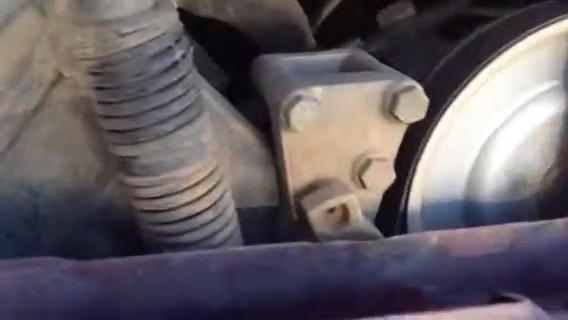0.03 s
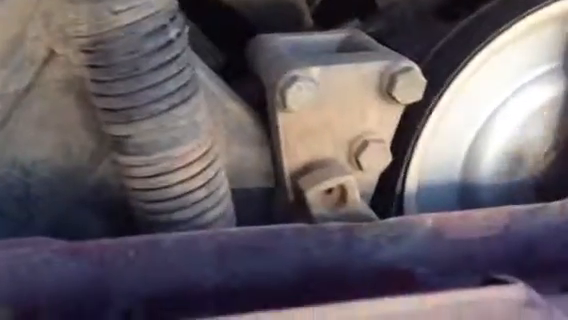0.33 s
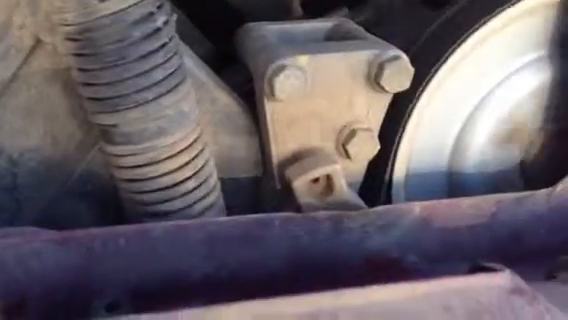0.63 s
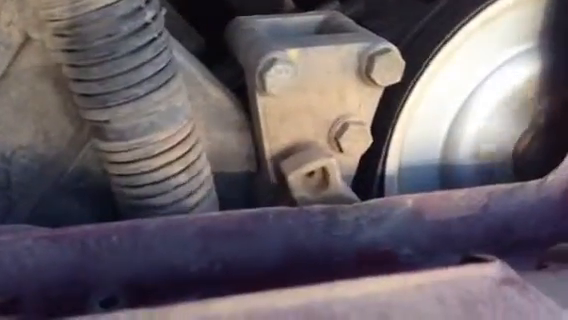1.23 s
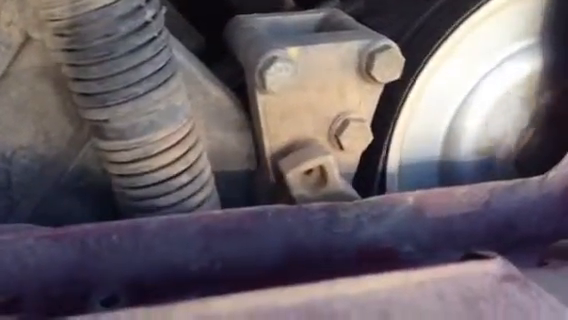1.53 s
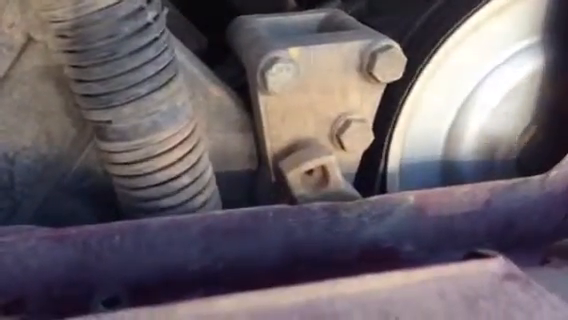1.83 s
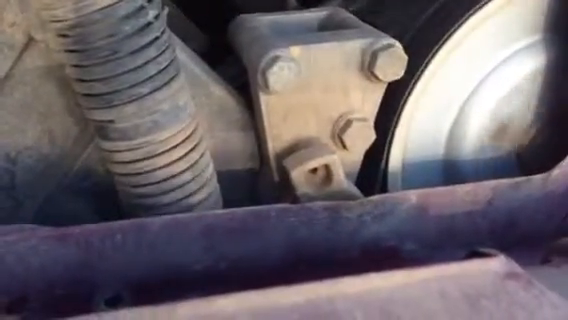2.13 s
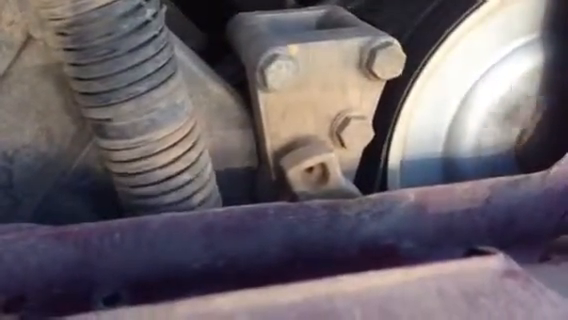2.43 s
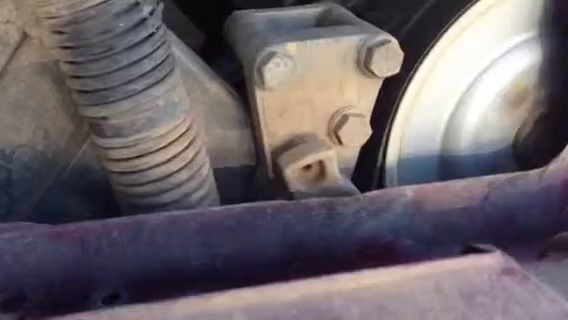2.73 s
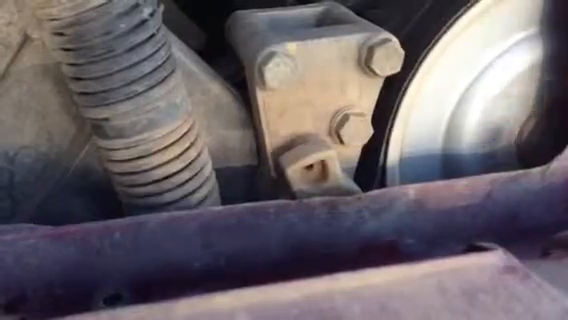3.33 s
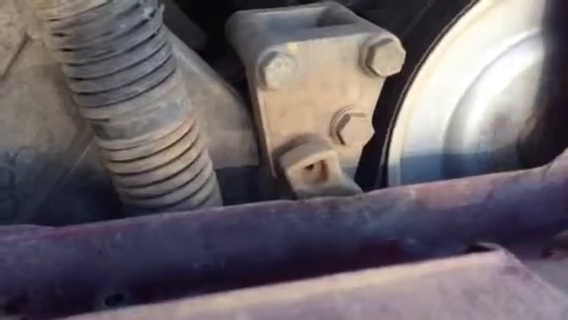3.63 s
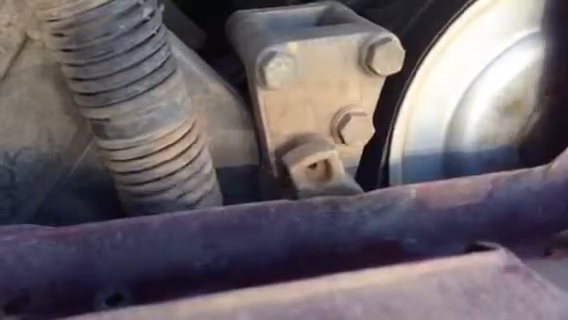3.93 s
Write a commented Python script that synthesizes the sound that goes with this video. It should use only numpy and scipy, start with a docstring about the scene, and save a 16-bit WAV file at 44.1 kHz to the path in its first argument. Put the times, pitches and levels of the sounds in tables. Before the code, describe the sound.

Constant shrill belt squeal close up, with an idling engine ticking and humming underneath.

```python
"""A drive belt squeals on its pulley, the microphone close by in the open bay of an idling engine.
The belt sticks and slips: each firing of the five cylinders jerks it, so the squeal warbles,
and worn patches come round with every lap. A near panel throws the squeal back.
Behind it the belt rubs and the valve gear ticks; underneath, the block knocks and hums
and the exhaust throbs with every cycle."""
import sys
import numpy as np
from scipy import signal
from scipy.fft import rfft, irfft
from scipy.io import wavfile
from scipy.ndimage import uniform_filter1d, minimum_filter1d

SR = 44100
rng = np.random.default_rng(int(sys.argv[2]) if len(sys.argv) > 2 else 0)


def inscribe(sig):
    """Save sig as 16-bit PCM at rate SR to the path in sys.argv[1].

    A 1-D sig is mono; a 2-D sig holds one channel per row.
    Samples are clipped to [-1, 1] before scaling.
    """
    pcm = np.round(np.clip(np.atleast_2d(sig).T, -1, 1) * 32767)
    wavfile.write(sys.argv[1], SR, pcm.astype(np.int16))


N = 176400
CYLINDERS = 5  # firings in one engine cycle


def undb(db):
    """Decibels to gain."""
    return 10 ** (np.asarray(db) / 20)


def level(x, db):
    """Scale to an rms level."""
    return x * undb(db) / np.sqrt(np.mean(x ** 2))


def colour(x, points):
    """Minimum-phase filter through the points (f/Hz, gain/dB)."""
    hz, db = np.array(points).T
    bins_hz = np.fft.rfftfreq(N, 1 / SR)
    log_gain = np.log(undb(np.interp(np.log(bins_hz + 1), np.log(hz), db)))
    cepstrum = irfft(log_gain, N)
    cepstrum[1:N // 2] *= 2
    cepstrum[N // 2 + 1:] = 0
    return irfft(rfft(x) * np.exp(rfft(cepstrum)), N)


def band_noise(low_hz, high_hz):
    """Noise in one band, rms 1."""
    band = signal.butter(2, [low_hz, high_hz], "band", fs=SR, output="sos")
    return level(signal.sosfilt(band, rng.standard_normal(N)), 0)


def wander(top_hz):
    """Random motion mostly slower than top_hz, rms 1."""
    ratio = np.fft.rfftfreq(N, 1 / SR) / top_hz
    return level(irfft(rfft(rng.standard_normal(N)) / (1 + ratio ** 2), N), 0)


def repeating(turns, count):
    """A random pattern of count equal partials that comes back with every turn, rms 1."""
    size = 32768
    partials = np.r_[0, np.exp(2j * np.pi * rng.random(count))]
    return level(np.interp(turns % 1 * size, np.arange(size), irfft(partials, size)), 0)


def clatter(firings, fresh):
    """Excitation that repeats each engine cycle, with a share of its power as fresh noise."""
    pattern = repeating(firings / CYLINDERS, count=1500)
    return np.sqrt(1 - fresh) * pattern + np.sqrt(fresh) * rng.standard_normal(N)


def swell(place, width_s, firings, rate):
    """Bell curve around a place in each engine cycle, and the seconds since its nearest peak."""
    age = ((firings - place + CYLINDERS / 2) % CYLINDERS - CYLINDERS / 2) / rate
    return np.exp(-(age / width_s) ** 2), age


def bay(x, t60_s=.04, tail_db=-17, panel_delay_s=.00492, panel_gain=.26):
    """The bay at the microphone: direct sound, one near panel and a short scattered tail."""
    t = np.arange(4096) / SR
    tail = rng.standard_normal(len(t)) * undb(-60 * t / t60_s)
    response = undb(tail_db) * tail / np.linalg.norm(tail)
    response[0] = 1
    response[round(panel_delay_s * SR)] += panel_gain
    return signal.fftconvolve(x, response)[:N]


# Response of the engine on its mounts (f/Hz, relative level/dB)
MOUNT_RESPONSE = [(20, -47), (55, -14), (85, -17), (125, -7.5), (190, 2.5), (245, 3.5), (300, 1),
                  (400, 0.5), (600, -15.5), (1500, -36)]
def drone(firings):
    """The engine shakes on its mounts: a low drone under everything."""
    return level(colour(clatter(firings, fresh=.74), MOUNT_RESPONSE), -35)


# Partials of the hum (f/firing rate, level/dB)
HUM_PARTIALS = [(3, -49), (4, -54.5), (8, -42.5), (9, -43.5), (16, -46), (17, -43.5), (20, -42), (21, -47)]
def hum(firings):
    """Harmonics of the firing rate, each drifting a little in phase."""
    out = np.zeros(N)
    for harmonic, db in HUM_PARTIALS:
        phase = 2 * np.pi * (round(harmonic) * firings + rng.random()) + .1 * wander(top_hz=8)
        out += undb(db) * np.sqrt(2) * np.sin(phase)
    return out


# Booms of the gas flow (place in the cycle/firings, f/Hz, half length/s, level/dB)
GAS_BOOMS = [(0.083, 254, 0.0051, -25), (0.689, 384, .011, -40.5), (1.07, 258, .007, -36),
             (1.324, 141.5, 0.017, -33.5), (1.9, 232, 0.013, -32), (2.55, 245, 0.023, -41.5),
             (3.243, 333.4, 0.021, -36.5), (3.949, 289, 0.0099, -33)]
def exhaust(firings, rate, scatter_db=1, waver_rad=.35):
    """The gas flow throbs: short low swells in each cycle, never quite alike."""
    out = np.zeros(N)
    for place, hz, half_length, db in GAS_BOOMS:
        envelope, age = swell(place, half_length, firings, rate)
        gain = np.sqrt(2) * undb(db + scatter_db * wander(top_hz=20))
        phase = 2 * np.pi * (hz * age + rng.random()) + waver_rad * wander(top_hz=37)
        out += gain * envelope * np.sin(phase)
    return out


# Resonances of the covers (f/Hz, width/Hz, level/dB, loudness phase/firings, swing/dB)
COVER_MODES = [(670, 59, -41, 1, 3), (1162.6, 51, -37.5, 0.54, -0.5), (1259, 71, -36.5, 0.68, 1)]
def covers(firings):
    """The covers ring in narrow bands that rise and fall with each firing."""
    out = np.zeros(N)
    for hz, width, db, place, swing_db in COVER_MODES:
        pulse = undb(swing_db * np.cos(2 * np.pi * (firings - place)))
        out += level(band_noise(hz - width / 2, hz + width / 2) * pulse, db)
    return out


# Knock of each cylinder (place in the cycle/firings, relative level/dB)
CYLINDER_KNOCKS = [(.68, -8), (1.53, 0), (2.55, -2.5), (3.54, 0.5), (4.55, 1.5)]
# Ring of the block (f/Hz, relative level/dB)
BLOCK_RESPONSE = [(150, -27), (300, -4), (420, -0.5), (600, -1.5), (670, -5), (760, -5), (950, 0),
                  (1170, 1.5), (1270, -2), (1400, -2.5), (1580, 1), (1750, -3.5), (1930, -14.5),
                  (2150, -13.5), (2330, -7), (3000, -13.5), (4000, -14), (9000, -21.5)]
def block_knock(firings, rate, width_s=.0045, floor=.69):
    """Combustion blows ring the block, over a steady floor of clatter."""
    force = floor
    for place, db in CYLINDER_KNOCKS:
        blow, _ = swell(place, width_s, firings, rate)
        force += undb(db) * blow
    return level(colour(force * clatter(firings, fresh=.64), BLOCK_RESPONSE), -29)


def valve_ticks(firings, rate, decay_s=.0082):
    """The valve gear ticks twice per firing, each noise burst with its own strength."""
    bursts = sum(np.exp(-((firings - place) % 1) / rate / decay_s) for place in (.097, .5))
    return level(bursts * undb(2 * wander(top_hz=50)) * rng.standard_normal(N), -28.5)


def belt_rub():
    """The belt rubs without a break: grainy friction noise."""
    return level(undb(2.5 * wander(top_hz=200)) * rng.standard_normal(N), -29)


# Colour of the ticking and rubbing at close range (f/Hz, gain/dB)
HISS_RESPONSE = [(1000, -21.5), (2500, 2), (3400, -7), (4700, 5), (5000, -1), (5300, 5.5), (6800, 2),
                 (8000, 6), (9300, 0.5), (10500, -1.5), (13000, -4.5), (15500, -6)]
def hiss(firings, rate):
    """Valve gear and belt blend into one bright layer behind the squeal."""
    return colour(valve_ticks(firings, rate) + belt_rub(), HISS_RESPONSE)


# Losses of grip (t/s, half length/s, change in tone level/dB, scratch level/dB)
BELT_SKIDS = [(0.099, 0.0047, -7, -21), (1.052, 0.0046, -9, -33), (1.117, .005, -13, -30),
              (1.428, 0.0055, -13, -18), (1.893, 0.0085, -8, -32), (2.518, 0.0046, -19, -22),
              (3.142, 0.018, -1.5, -40), (3.913, 0.0049, -21, -18), (3.973, 0.0036, -16, -40)]
def skids(t):
    """The belt loses its grip: dips in the tone's level (dB) and the envelope of the scratching."""
    dip_db, scratch = np.zeros(N), np.zeros(N)
    for at, half_length, drop_db, scratch_db in BELT_SKIDS:
        skid = np.exp(-((t - at) / half_length) ** 2)
        dip_db += drop_db * skid
        scratch += undb(scratch_db) * skid
    return dip_db, scratch


# Belt slip from one firing to the next (place/firings, pitch shift/Hz, relative level/dB)
BELT_SLIP = [(0, 0, 0), (.1, 255, 0), (.23, -85, 0), (.41, 225, .5), (.52, 215, 0), (.61, -160, -2),
             (.7, -345, -4.5), (.82, -135, 0), (.92, -120, 0)]
# How the pulley radiates the squeal (f/Hz, relative level/dB)
PULLEY_RESPONSE = [(3000, 0), (3600, -4.5), (3850, 0.5), (4050, 2.5), (4450, 1), (4650, 0.5), (5000, -2.5),
                   (5500, -4), (7000, 9)]
def belt_squeal(t, firings, centre_hz=4182, pulley_turns_per_s=31.5, laps_per_s=4.445):
    """Up front, the belt's stick-slip tone, pulled about by firings, crank, pulley and worn patches."""
    place, shift_hz, slip_db = np.array(BELT_SLIP).T
    laps = laps_per_s * t
    crank_turns = 2 * (firings - 1.042) / CYLINDERS
    hz = centre_hz + np.interp(firings, place, shift_hz, period=1)
    hz += 59.2 * np.cos(2 * np.pi * crank_turns)
    hz += 53 * np.cos(2 * np.pi * pulley_turns_per_s * t)
    hz += 24.9 * np.sin(2 * np.pi * 7 * firings)  # chatter, seven times per firing
    hz += 64.6 * repeating(laps, count=13) + 59.4 * wander(top_hz=616)  # wear and jitter
    phase = 2 * np.pi * np.cumsum(hz) / SR

    dip_db, scratch = skids(t)
    db = dip_db + 1.12 * repeating(laps, count=9) + 1.5 * wander(top_hz=350)  # skids, wear, flutter
    grip = undb(db + np.interp(firings, place, slip_db, period=1))
    strain = undb(.98 * db + 5 * np.cos(2 * np.pi * (firings - .75)))  # peaks late in each firing
    rasp = 1 + undb(-25) * wander(top_hz=1990)

    tone = colour(grip * np.sin(phase) * rasp, PULLEY_RESPONSE)
    octave = strain * np.sin(2 * phase) * (1 + .16 * wander(top_hz=403))
    third_harmonic = grip * np.sin(3 * phase) * (1 + .66 * wander(top_hz=500))
    squeal = level(tone, -12) + level(octave, -31) + level(third_harmonic, -46)
    return squeal + scratch * band_noise(low_hz=4640, high_hz=5580)


# Idle speed (t/s, firing rate/Hz)
IDLE_SPEED = [(0, 32.17), (1.2, 32.19), (1.9, 32.11), (2.5, 32.29), (3, 32.23), (4, 32.16)]
# Slow change in how hard the belt rubs, applied to squeal and hiss (t/s, level/dB)
RUB_EFFORT = [(0, -0.5), (1, 0.5), (1.95, -.9), (2.7, 0), (3.3, 0), (4, 0)]
def scene():
    """One microphone close to the engine, whose speed paces the belt, the block and the valve gear."""
    t = np.arange(N) / SR
    rate = np.interp(t, *np.array(IDLE_SPEED).T)
    firings = .055 + np.cumsum(rate) / SR
    effort = undb(np.interp(t, *np.array(RUB_EFFORT).T))
    belt_and_valves = bay(belt_squeal(t, firings)) + hiss(firings, rate)
    engine = block_knock(firings, rate) + covers(firings) + drone(firings) + hum(firings)
    return (effort * belt_and_valves + engine + exhaust(firings, rate))[None]


def record(dry):
    """After the microphone, a fast limiter holds the peaks, then the top is cut."""
    ceiling, top_hz = .68, 15300
    needed_gain = ceiling / np.maximum(abs(dry), ceiling)
    gain = uniform_filter1d(minimum_filter1d(needed_gain, size=200), size=200)
    lowpass = signal.ellip(12, .1, 90, top_hz, fs=SR, output="sos")
    return signal.sosfilt(lowpass, dry * gain)


dry = scene()
out = record(dry)
inscribe(out)
```